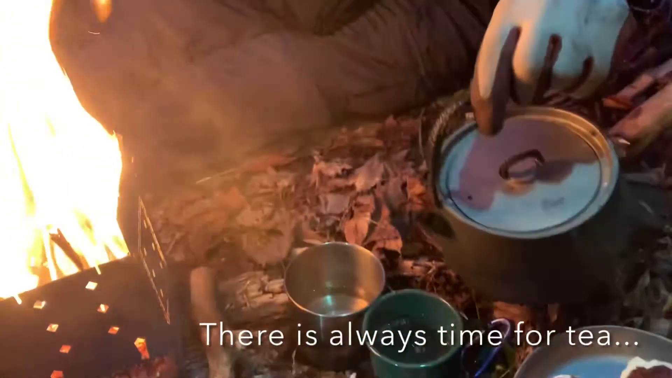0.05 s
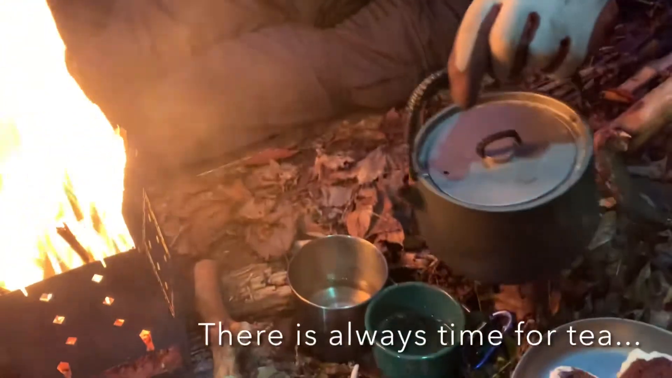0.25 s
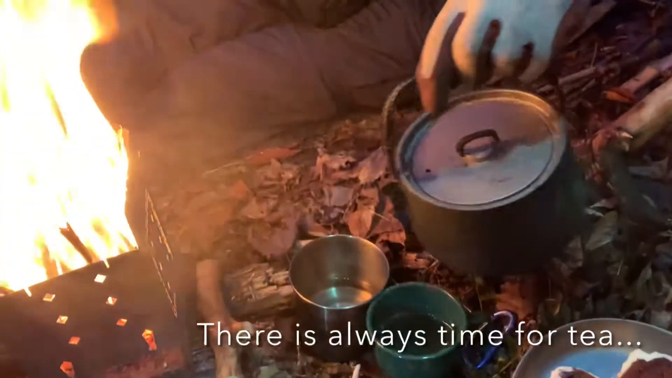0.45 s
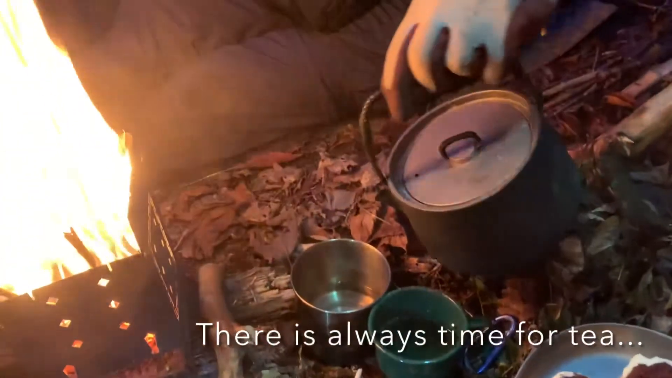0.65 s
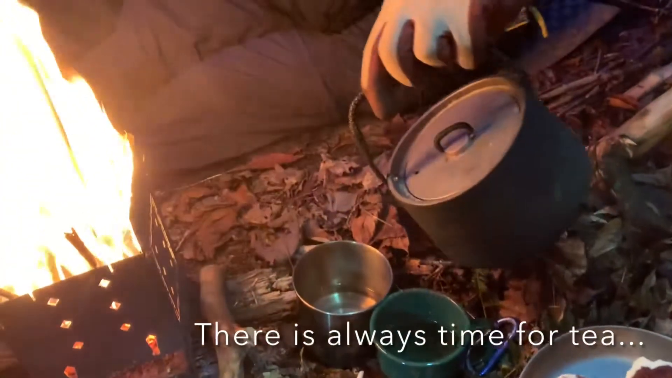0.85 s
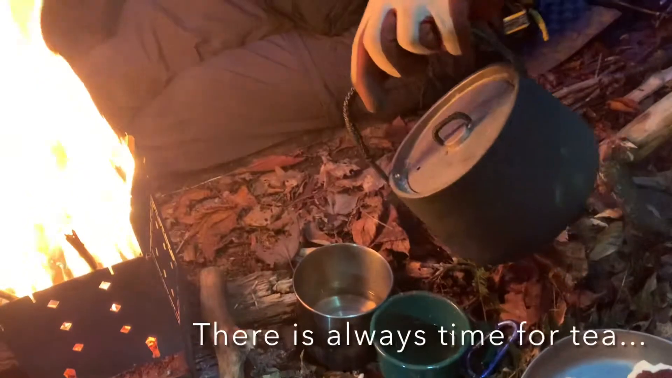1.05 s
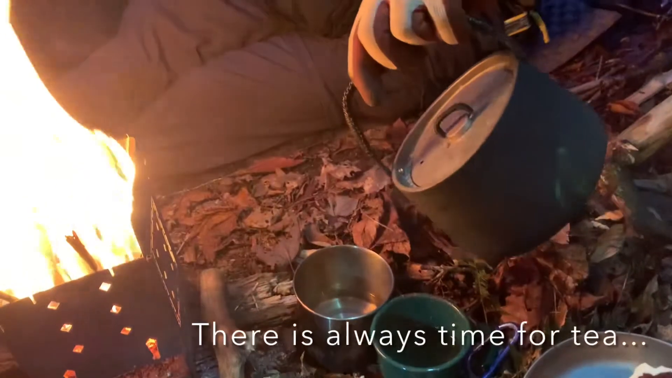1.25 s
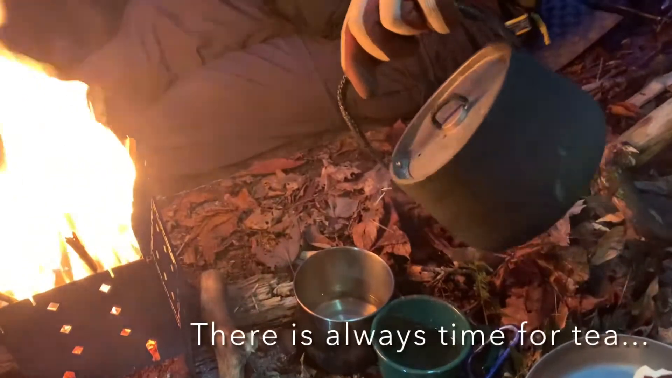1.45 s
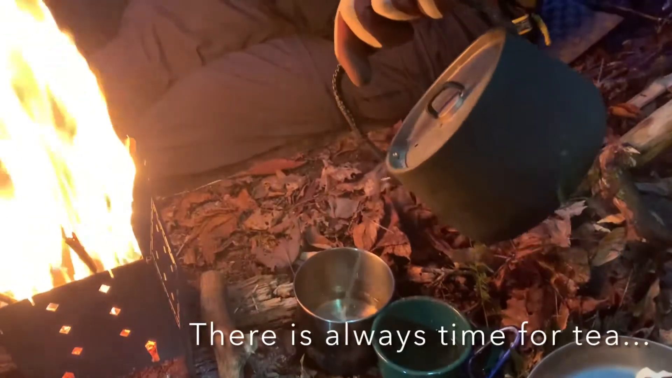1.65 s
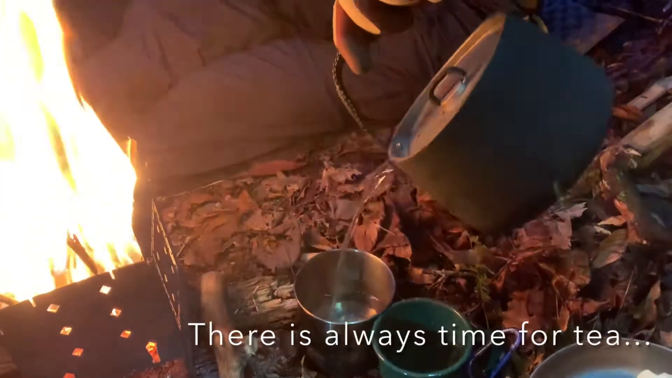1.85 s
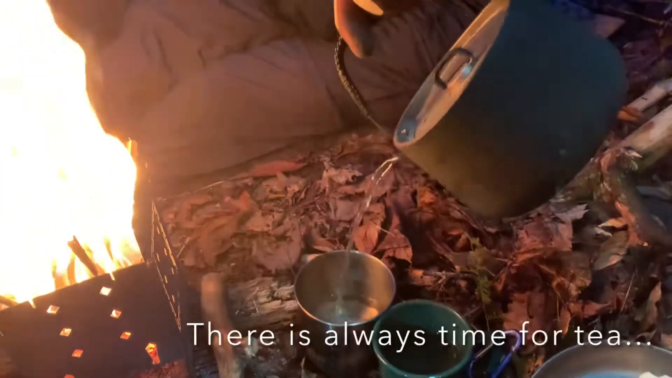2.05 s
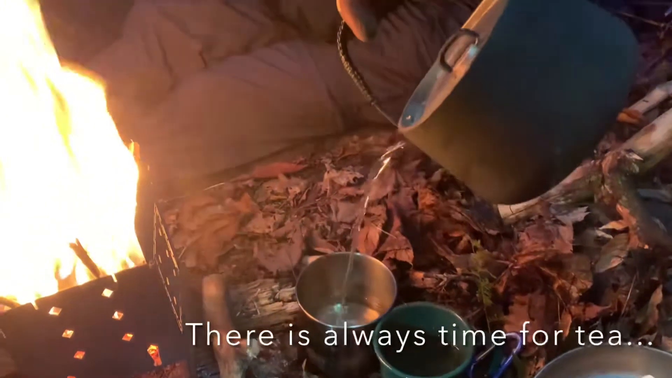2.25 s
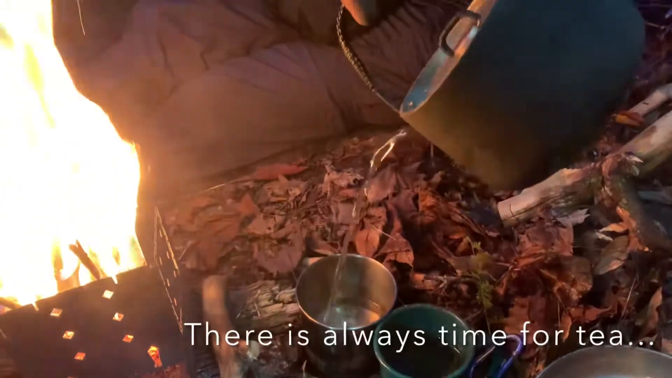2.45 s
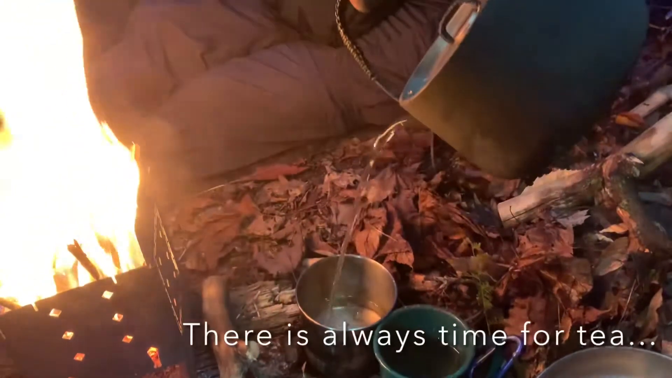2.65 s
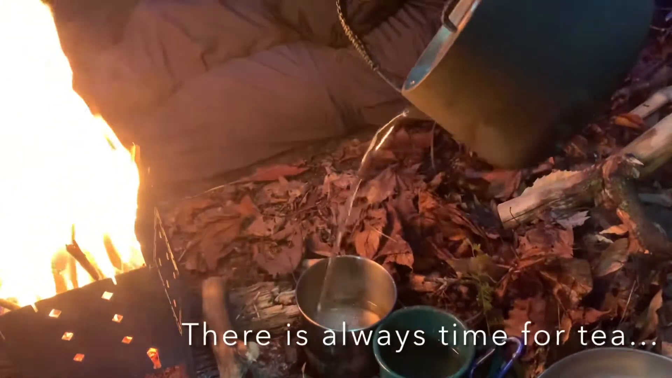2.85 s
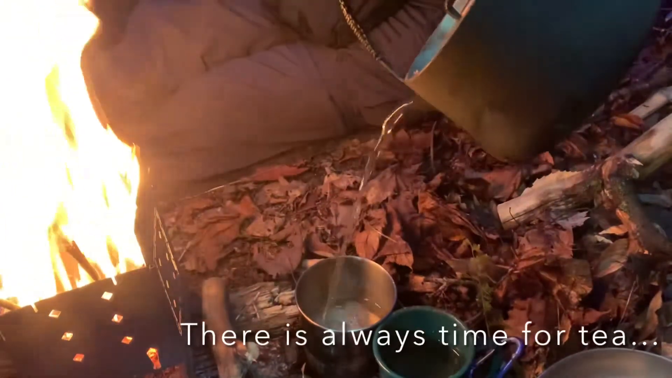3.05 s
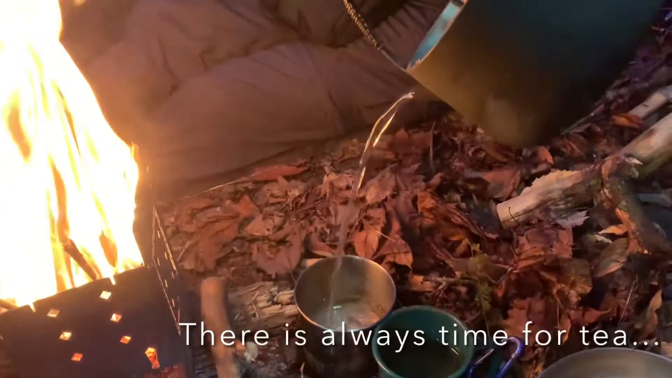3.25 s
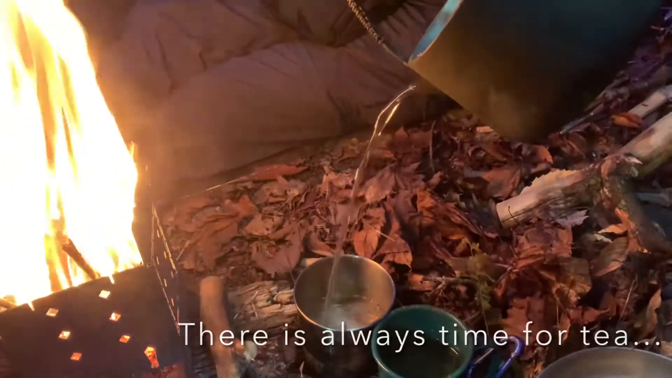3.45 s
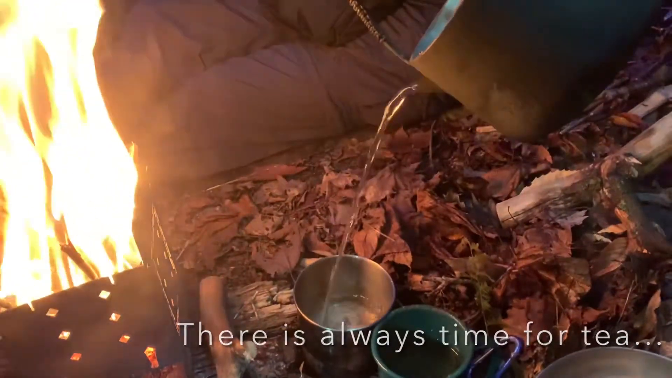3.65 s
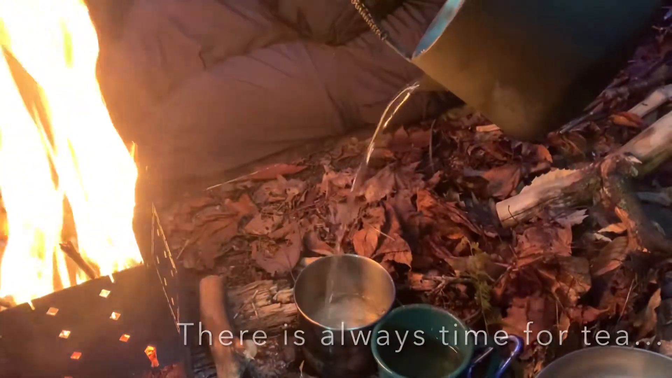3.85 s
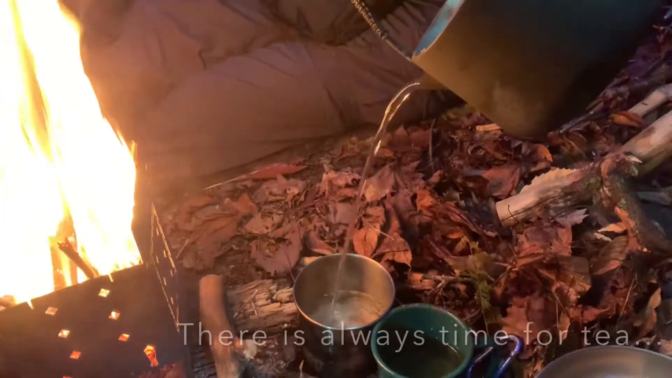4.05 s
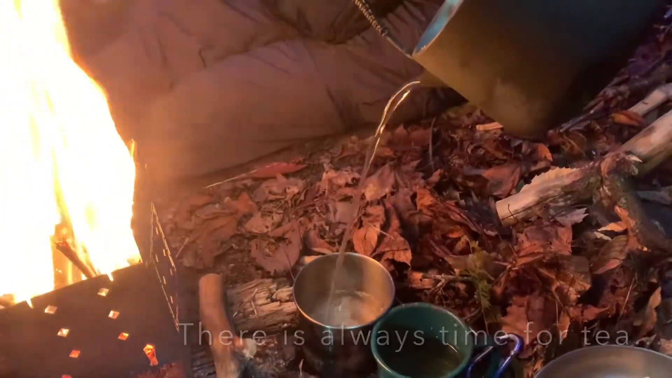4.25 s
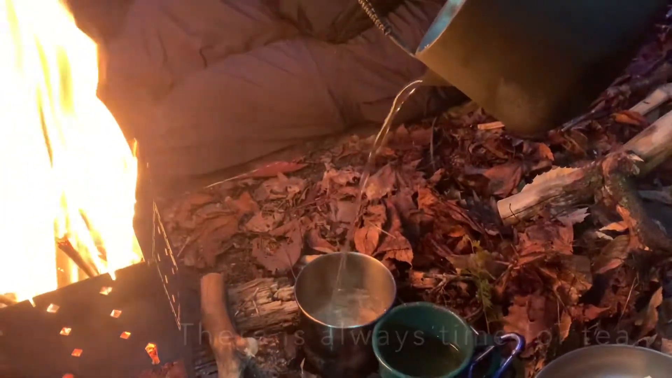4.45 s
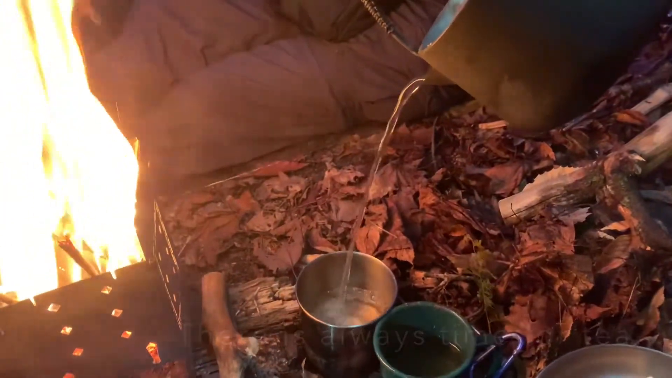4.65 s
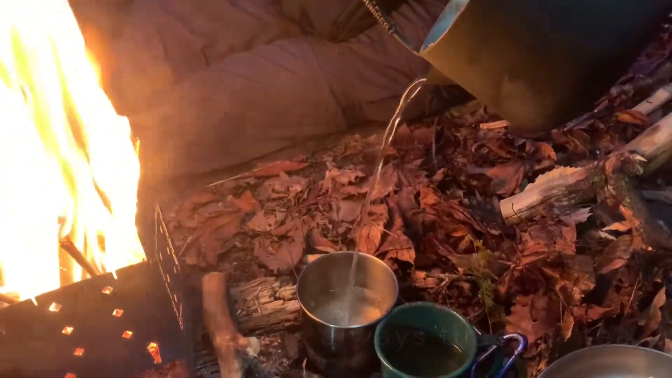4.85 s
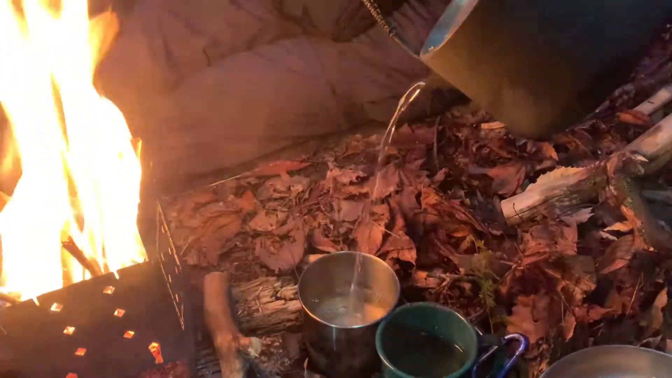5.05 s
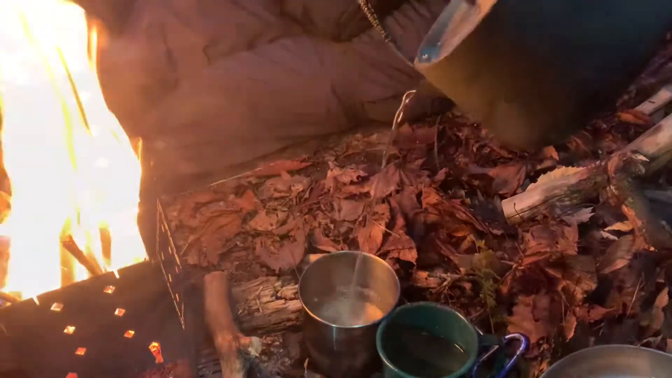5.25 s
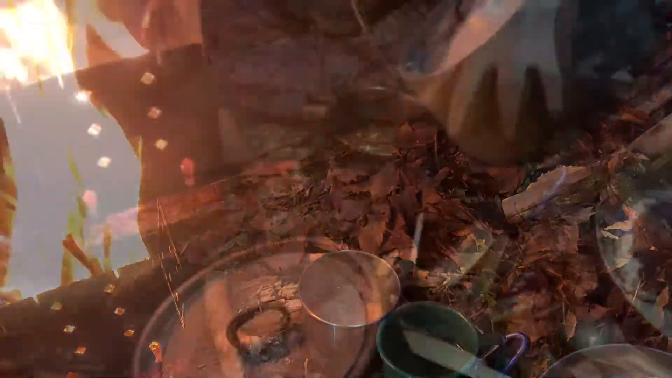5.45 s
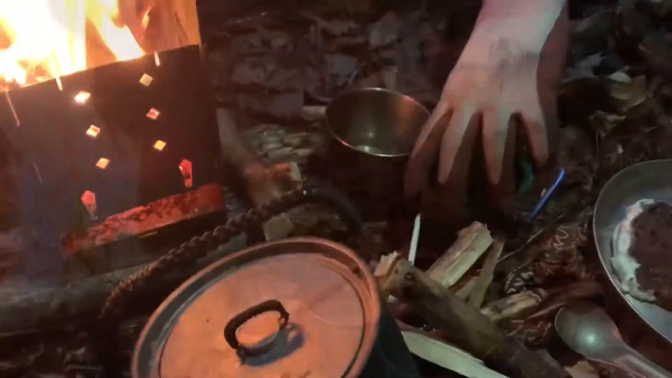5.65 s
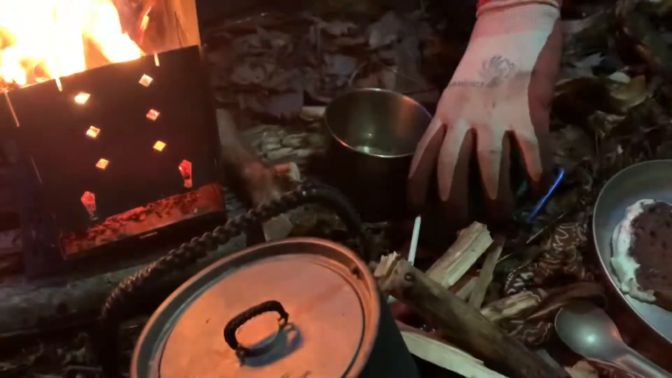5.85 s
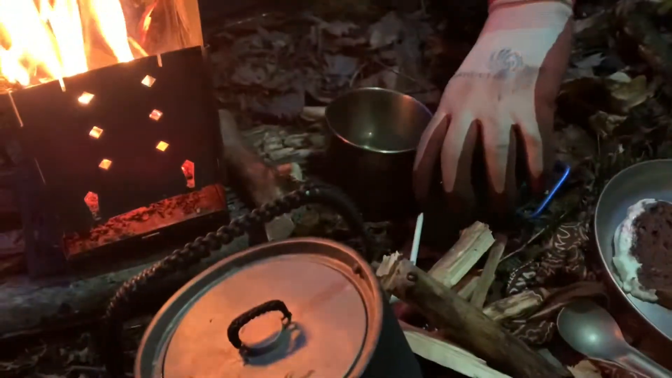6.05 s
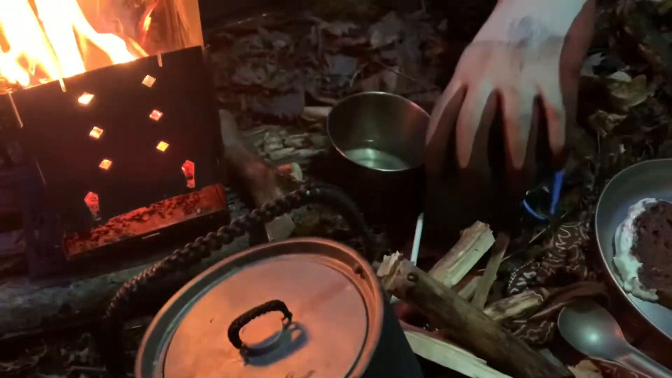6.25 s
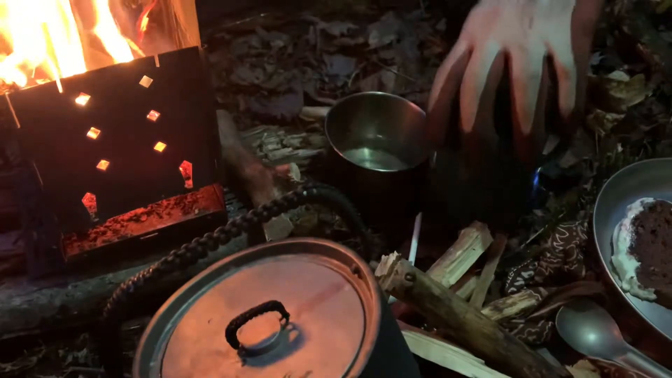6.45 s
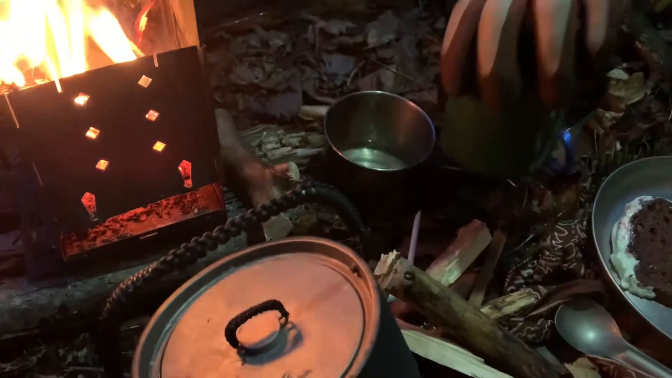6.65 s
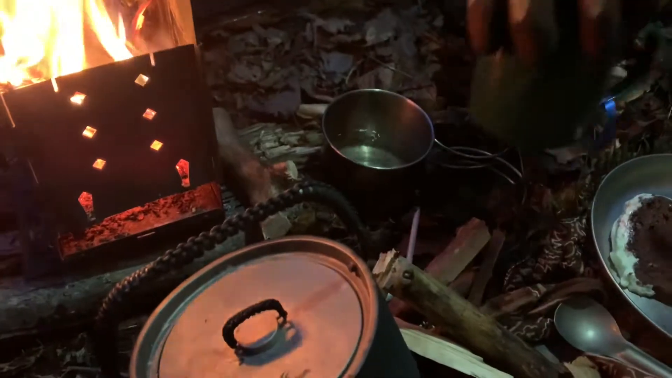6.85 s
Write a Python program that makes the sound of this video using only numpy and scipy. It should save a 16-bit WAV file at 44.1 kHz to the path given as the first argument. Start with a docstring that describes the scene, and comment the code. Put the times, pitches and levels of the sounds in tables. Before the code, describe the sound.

Tea pours from a pot into a metal mug beside a hissing, popping fire, followed by a brief clinking of mug and clip.

```python
"""Tea poured beside a wood stove

Flames rumble, sap hisses and the wood pops. Tea falls from a pot into a steel mug: the broken stream excites
the mug's normal modes and traps air bubbles, which ring as a gurgle. The fire sounds drop in level at about 5.5
s; then a hand picks up an enamel mug that rattles against a metal clip. Two spaced microphones hear it all
outdoors."""
import sys
import numpy as np
from scipy import signal
from scipy.fft import rfft, irfft, next_fast_len
from scipy.io import wavfile
from scipy.ndimage import uniform_filter1d, map_coordinates

SR = 44100
rng = np.random.default_rng(int(sys.argv[2]) if len(sys.argv) > 2 else 0)


def output_pcm(signal):
    """Save a mono or channel-first signal as 16-bit PCM at the path in sys.argv[1].

    Samples are clipped to [-1, 1] before scaling.
    """
    pcm = np.clip(np.atleast_2d(signal).T, -1, 1) * 32767
    wavfile.write(sys.argv[1], SR, np.round(pcm).astype(np.int16))


N = 304285
# Above the split, the left channel's treble lags slightly, which widens the sound.
SPLIT_HZ, TREBLE_LAG_S = 8300, 13 / SR


def amp(db):
    """Decibels to amplitude ratio."""
    return 10 ** (np.asarray(db) / 20)


def unit(x):
    """Normalisation to an rms of 1."""
    return x / np.sqrt(np.mean(x ** 2) + 1e-20)


def gain(spectrum, hz):
    """Amplitude response through (frequency_hz, level_db) points on a log frequency axis."""
    knots_hz, db = np.transpose(spectrum)
    return amp(np.interp(np.log(hz + 1), np.log(knots_hz + 1), db))


def contour(points):
    """Linear interpolation of (time_s, value) points at every sample."""
    return np.interp(np.arange(N) / SR, *np.transpose(points))


def wobble(rate_hz):
    """Smooth random modulation: a spline through Gaussian knots."""
    knots = rng.standard_normal(int(N * rate_hz / SR) + 4)
    return map_coordinates(knots, [np.arange(N) * rate_hz / SR])


def filtered(x, response):
    """Linear filtering: the spectrum times a frequency response."""
    size = next_fast_len(N + SR // 2)
    return irfft(rfft(x, size) * response(np.fft.rfftfreq(size, 1 / SR)), size)[..., :N]


def noise(spectrum, channels=1):
    """Coloured Gaussian noise of rms 1."""
    return unit(filtered(rng.standard_normal((channels, N)), lambda hz: gain(spectrum, hz)))


def burst(t, t60_s):
    """Exponential decay: white noise falling 60 dB in t60_s."""
    return amp(-60 * t / t60_s) * rng.standard_normal(len(t))


def add(track, start_s, sound):
    """Superposition of a short sound on a track."""
    part = track[round(start_s * SR):][:len(sound)]
    part += sound[:len(part)]


def resonances(modes, f):
    """Modal response: a sum of damped oscillators of alternating sign."""
    return sum((-1) ** k * amp(db) * 1j * f * width / (hz * hz - f * f + 1j * f * width)
               for k, (hz, width, db) in enumerate(modes))


def bubble(hz, cycles, rise):
    """Bubble resonance: a damped sine whose pitch climbs as the bubble nears the surface."""
    turns = np.arange(int(3 * cycles * SR / hz)) * hz / SR
    envelope = np.exp(-2 * turns / cycles) * (1 - np.exp(-turns / 0.5))
    return envelope * np.sin(2 * np.pi * turns * (1 + rise * turns / cycles))


def stereo(x, left_lead_s, scatter_db, left_db):
    """Time and level differences between the channels, plus separate scattering in each."""
    def delays(hz):
        whole = round(SPLIT_HZ * (left_lead_s + TREBLE_LAG_S))  # whole turns join the slopes smoothly
        above = np.clip((hz - SPLIT_HZ) / 1200 + .5, 0, 1)
        turns = (1 - above) * hz * left_lead_s + above * (whole - hz * TREBLE_LAG_S)
        return np.exp(-2j * np.pi * np.outer([0, 1], turns))
    t = np.arange(SR // 40) / SR
    tail = np.diff(rng.standard_normal((2, len(t) + 1))) * amp(-60 * t / 0.017) * (1 - np.exp(-t * 2000))
    scatter = signal.fftconvolve(x[None], tail / np.linalg.norm(tail[0]), axes=1)[:, :N]
    return (filtered(x, delays) + amp(scatter_db) * scatter) * amp([[left_db / 2], [-left_db / 2]])


# Loudness of the flames: time_s, level_db
FLAME_LEVEL = [(0, -55), (.2, -52.5), (.9, -58), (1.2, -50), (1.35, -58), (1.58, -52), (1.75, -49.5),
               (2.04, -54), (2.3, -51), (2.6, -53.5), (3.3, -51), (3.45, -46), (3.8, -51.5), (4.2, -48.5),
               (4.9, -52.5), (5.2, -56), (5.32, -59), (5.55, -59), (6.15, -63.5), (6.9, -61.5)]
# Flame spectrum: frequency_hz, level_db
FLAME_SPECTRUM = [(13, -47), (28, -29), (49, 1), (97, -2.5), (183, -14.5), (262, -21.5), (295, -28.5),
                  (474, -36), (747, -46.5), (1520, -73), (2500, -58), (3250, -96), (5500, -120)]

def flames():
    """Combustion noise: an uneven rumble, nearly alike on both sides at long wavelengths."""
    mid, side = noise(FLAME_SPECTRUM, channels=2) * amp(2.17 * wobble(14) + 3.44 * wobble(7))
    side = filtered(side, lambda hz: amp(-21) * np.sqrt(1 + (hz / 200) ** 2))
    rumble = unit(mid + np.array([side, -side])) * amp([[.4], [-.4]])
    return amp(contour(FLAME_LEVEL)) * rumble


# Loudness of the sap: time_s, level_db
SAP_LEVEL = [(0, -55), (.25, -52.5), (.5, -56.5), (1.5, -55), (2.8, -50.5), (3.6, -54), (4.6, -51.5),
             (5.2, -53.5), (5.4, -60.5), (5.55, -74.5), (6.9, -69.5)]
# Sap spectrum: frequency_hz, level_db
SAP_SPECTRUM = [(900, -39), (2000, -58), (3000, -18.5), (4000, -11), (5000, 0), (6500, 3), (8000, 7.5),
                (11000, 5), (14000, 9.5), (15600, 1.5), (16000, -21), (17500, -46.5)]

def sap_hiss():
    """Amplitude-modulated noise: sap hisses with a flicker and sparse tiny crackles."""
    crackles = amp(4.8 * rng.standard_exponential(N) * (rng.random(N) < .01))
    hiss = noise(SAP_SPECTRUM, channels=3) * amp(0.38 * wobble(4.8) + 1.6 * wobble(45))
    hiss = amp(contour(SAP_LEVEL)) * unit(hiss * uniform_filter1d(crackles, size=12))
    return stereo(hiss[0], TREBLE_LAG_S, scatter_db=-26.5, left_db=-0.9) + amp(-11) * hiss[1:]


# Background of quiet woods: frequency_hz, level_db
AIR_SPECTRUM = [(200, 8.5), (500, 4), (1500, -5.5), (4000, -2), (14000, -18), (16000, -20.5), (17500, -22)]

def outdoor_air():
    """Ambient noise, uncorrelated between the microphones."""
    return amp(-75.5) * noise(AIR_SPECTRUM, channels=2)


# Low thumps: start_s, level_db, start_hz, end_hz, attack_s
LOW_THUMPS = [(0.045, -56.5, 600, 300, 0.00087), (1.557, -35.5, 200, 61, 0.00023),
              (3.446, -36, 156, 61, .0003), (5.229, -22.5, 427, 42.7, 0.00032),
              (5.645, -44.5, 252.5, 74.6, 0.0023), (6.186, -51, 350, 331, 0.0056),
              (6.265, -44.5, 164, 71.6, 0.00087), (6.774, -43, 149, 70.6, 0.0027)]

def thumps():
    """Damped chirps: short, dull tones that fall in pitch."""
    track, t = np.zeros(N), np.arange(SR // 15) / SR
    fade = np.cos(np.pi * t / (2 * t[-1]))
    for start_s, db, start_hz, end_hz, attack_s in LOW_THUMPS:
        turns = np.cumsum(end_hz + (start_hz - end_hz) * np.exp(-t / 0.006)) / SR
        envelope = amp(db - 60 * t / 0.13) * (1 - np.exp(-(t / attack_s) ** 2)) * fade
        add(track, start_s, envelope * np.sin(2 * np.pi * turns))
    return track


# Pops of burning wood: start_s, level_db, tail_db
WOOD_POPS = [(0.106, -46.5, -8), (0.3267, -38, -8.5), (0.599, -30.5, -5.5), (1.542, -6.5, -5),
             (1.83, -30, -11), (2.132, -33.5, -9), (3.31, -28, -6.5), (3.4369, -6.5, -10),
             (4.0345, -8, -14), (4.039, -7, -7.5), (5.2255, -12, -1), (5.3861, -38, -2), (5.652, -54, -6)]
# Pop spectrum: frequency_hz, level_db
POP_SPECTRUM = [(300, -9), (1200, -8), (2000, -10), (3500, -5), (6500, 3.5), (10000, 0.5), (14000, 0.5),
                (16500, -15)]

def wood_pops(rise_s=.00013):
    """Broadband impulses: a millisecond crack, then a short hissing tail."""
    track, t = np.zeros(N), np.arange(SR // 15) / SR
    for start_s, db, tail_db in WOOD_POPS:
        snap = np.sign(rng.standard_normal(len(t))) * t / rise_s * np.exp(-t / rise_s)
        add(track, start_s, amp(db + 10) * (snap + amp(tail_db - 16.5) * burst(t, 0.041)))
    cracks = filtered(track, lambda hz: gain(POP_SPECTRUM, hz))
    return stereo(cracks, TREBLE_LAG_S, scatter_db=-17, left_db=-0.5)


# Loudness of the stream: time_s, level_db
FLOW_LEVEL = [(1.555, -120), (1.565, -52), (1.79, -65.5), (1.835, -49.5), (2.07, -53), (2.12, -47),
              (3.45, -43), (4.15, -43), (4.5, -41.5), (4.9, -39.5), (5.05, -43), (5.23, -40), (5.25, -55.5),
              (5.48, -55.5), (5.56, -120)]
# Spray spectrum: frequency_hz, level_db
SPRAY_SPECTRUM = [(1200, -9.5), (2500, -15.5), (3300, -3.5), (4500, 7.5), (6500, 0.5), (10000, -2),
                  (14500, -10), (16000, -42.5)]

def pouring():
    """Liquid impact: resonances of mug and bubbles gurgle under broadband spray."""
    flow_db = contour(FLOW_LEVEL)
    flow = amp(flow_db)
    glugs, slug_spray = slugs(flow_db)
    pings, splash_spray = splashes()
    gurgle = stream(flow) + glugs + droplets(flow) + drips() + froth(flow) + pings
    mist = amp(-10.5 + 4.5 * wobble(80)) * flow * rng.standard_normal(N)
    spray = filtered(mist + slug_spray + splash_spray + spatter(flow),
                     lambda hz: gain(SPRAY_SPECTRUM, hz))
    # The mug is nearer the left microphone.
    return stereo(gurgle + spray, left_lead_s=4 / SR, scatter_db=-5, left_db=.6)


# Modes of the steel mug: pitch_hz, width_hz, level_db
STEEL_MODES = [(485.7, 33.6, 8), (730, 70, 0.5), (860, 190, -3), (1107, 81, 6), (1333, 53, 2.5),
               (1910, 330, -12), (2436, 59, -2), (3780, 260, -10)]

def stream(flow):
    """Forced vibration: the broken stream drives the mug's modes with separate taps."""
    patter = rng.standard_normal(N) * (0.3 + 8 * (rng.random(N) < .005))
    force = amp(5.5 + 5.5 * wobble(35)) * flow * patter
    return filtered(force, lambda hz: resonances(STEEL_MODES, hz))


# Prominent slugs of tea: start_s, level_db, pitch_hz
TEA_SLUGS = [(1.558, -34.5, 793), (1.64, -58, 920), (1.668, -39, 1194), (1.694, -34, 980),
             (1.828, -35.5, 930), (1.893, -35, 976), (1.971, -40.5, 883), (2.053, -43.5, 887),
             (2.094, -31.5, 886), (2.11, -30, 1016), (2.163, -31.5, 478), (2.194, -32.5, 490),
             (2.269, -33, 794), (2.297, -34, 780), (2.339, -38.5, 800), (2.362, -33.5, 1070),
             (2.406, -40, 504), (2.501, -33.5, 470), (2.51, -29, 1086), (2.578, -30, 484),
             (2.598, -37, 676), (2.626, -40, 1003), (2.666, -41, 527), (2.709, -32.5, 1007),
             (2.721, -41.5, 1130), (2.774, -38, 486), (2.813, -35, 1100), (2.902, -33.5, 654),
             (2.924, -37, 468), (2.976, -38.5, 990), (3.033, -30, 1060), (3.078, -27.5, 477),
             (3.117, -29, 490), (3.235, -32, 463), (3.263, -35.5, 1094), (3.282, -30, 456),
             (3.303, -39, 1034), (3.339, -33, 517), (3.358, -34.5, 440), (3.377, -34, 432),
             (3.404, -34, 1070), (3.598, -30, 1054), (3.643, -34, 1300), (3.674, -27.5, 1340),
             (3.718, -38, 1030), (3.741, -30.5, 453), (3.794, -39, 1204), (3.82, -40, 1110),
             (3.864, -32, 465), (3.876, -30, 410), (3.928, -32.5, 1090), (3.99, -34, 442),
             (4.115, -43.5, 466), (4.166, -27.5, 1093), (4.184, -27, 501), (4.224, -31.5, 914),
             (4.3, -25, 1082), (4.319, -29, 1040), (4.407, -46.5, 1070), (4.449, -45, 1000),
             (4.485, -25.5, 1028), (4.589, -26.5, 933), (4.617, -41, 1050), (4.639, -32, 1045),
             (4.666, -36.5, 510), (4.684, -31.5, 454), (4.728, -37.5, 487), (4.787, -32, 485),
             (4.805, -31, 980), (4.836, -30, 1090), (4.859, -28.5, 1064), (4.886, -27, 720),
             (4.918, -31, 730), (5.006, -42, 1110), (5.078, -28, 1064), (5.095, -23, 1220),
             (5.136, -31, 1094), (5.168, -29.5, 453), (5.206, -30.5, 983), (5.273, -45, 967),
             (5.419, -41.5, 905)]

def slugs(flow_db, loss_db_per_octave=4):
    """Impact excitation: a slug sprays, traps a bubble and rings the mug modes near its pitch."""
    glugs, spray = np.zeros((2, N))
    t = np.arange(SR // 20) / SR
    f = np.fft.rfftfreq(2 * len(t), 1 / SR)
    lesser = []
    for start_s in rng.uniform(2.2, 5.2, size=40):
        size, pick, detune = rng.standard_normal(3)
        hz = (1052 if pick > 0 else 445) * (1 + 0.094 * detune)  # around two tones of the mug
        lesser.append((start_s, flow_db[round(start_s * SR)] - 0.5 + 4.4 * size, hz))
    for start_s, db, hz in TEA_SLUGS + lesser:
        modes = [(pitch, width, level - loss_db_per_octave * abs(np.log2(pitch / hz)) + rng.normal(0, 2))
                 for pitch, width, level in STEEL_MODES]
        slap = burst(t, 0.018) * (1 - np.exp(-t / 0.0005))
        ring = irfft(rfft(slap, 2 * len(t)) * resonances(modes, f))
        add(glugs, start_s, amp(db - 3) * ring / np.abs(ring).max())
        add(spray, start_s, amp(db - 10.5 + rng.normal(0, 3)) * burst(t, 0.0088))
        tone = bubble(hz, cycles=hz * rng.uniform(.009, 0.023), rise=rng.uniform(0, .12))
        add(glugs, start_s, amp(db - 3.5) * tone)
    return glugs, spray


def droplets(flow):
    """Air entrainment: droplets trap bubbles, the small ones higher and fainter."""
    track = np.zeros(N)
    for when, pitch, faintness in rng.random((650, 3)):
        start_s = 1.56 + 3.9 * when
        strength = flow[round(start_s * SR)] * amp(-10 - 4 * np.log(faintness + 0.0055) - 9 * pitch)
        add(track, start_s, strength * bubble(650 * 11 ** pitch, cycles=20.2, rise=0.012))
    return track


# Distinct drops: start_s, level_db, pitch_hz, rise_ratio, decay_cycles
CLEAR_DROPS = [(1.598, -45, 750, .042, 5), (1.718, -37, 950, 0.45, 5.6), (1.727, -42.5, 1950, 0.26, 12),
               (1.752, -44.5, 2300, 0.1, 12), (1.943, -39.5, 2350, 0.04, 14),
               (1.792, -50.5, 1270, .05, 8.8), (1.802, -47.5, 2500, 0.037, 15), (1.9, -46, 800, 0.12, 11),
               (3.105, -33, 2400, 0.022, 16), (4.099, -54, 1197, .03, 9.7), (5.449, -48, 887, 0.082, 9.5),
               (5.481, -44.5, 2470, 0.024, 20.4), (5.505, -50.5, 2430, 0.022, 12)]

def drips():
    """Free oscillation of single bubbles: each drop gives a clear rising note."""
    track = np.zeros(N)
    for start_s, db, hz, rise, cycles in CLEAR_DROPS:
        add(track, start_s, amp(db) * bubble(hz, cycles, rise))
    return track


def froth(flow):
    """Resonant frequency varies inversely with radius: tiny bubbles ping in the treble."""
    track = np.zeros(N)
    for when, pitch, faintness in rng.random((450, 3)):
        start_s = 1.8 + 3.5 * when
        strength = flow[round(start_s * SR)] * amp(-16 - 3 * np.log(faintness + .03))
        add(track, start_s, strength * bubble(2600 * 2.6 ** pitch, cycles=12, rise=0.02))
    return track


# Splashes in the mug: start_s, level_db, pitch_hz
TEA_SPLASHES = [(1.944, -31.5, 3720), (1.975, -39, 4370), (2.531, -37, 4300), (2.599, -40, 7300),
                (2.664, -36.5, 4200), (2.105, -29, 6200), (2.1952, -27, 6700), (2.294, -34.5, 6000),
                (2.371, -35.5, 9600), (2.746, -35, 13000), (2.818, -34, 9960), (2.856, -33, 9500),
                (3.04, -33, 2250), (3.196, -39, 10460), (3.234, -31.5, 2400), (3.5968, -29, 5600),
                (3.7406, -26.5, 7500), (3.8772, -34, 10400), (3.982, -31.5, 10700), (4.056, -30, 5950),
                (4.1673, -37, 9420), (4.32, -28, 4800), (4.4052, -29.5, 9360), (4.446, -36, 13500),
                (4.477, -35, 10550), (4.638, -29, 6030), (4.762, -31.5, 7560), (4.799, -31.5, 7900),
                (4.919, -21.5, 2470), (5.0502, -30, 2470)]

def splashes():
    """Impact noise and bubble resonance: each splash is a high ping with a burst of spray."""
    pings, spray = np.zeros((2, N))
    t = np.arange(SR // 20) / SR
    for start_s, db, hz in TEA_SPLASHES:
        add(spray, start_s, amp(db - 3.5) * burst(t, 0.039) * (1 - np.exp(-t / 0.00014)))
        add(pings, start_s, amp(db - 2.5) * bubble(hz, cycles=5 + hz * 0.0053, rise=0.0055))
    return pings, spray


def spatter(flow):
    """Shot noise: fine drops tick on the steel wall at random times."""
    track, t = np.zeros(N), np.arange(SR // 20) / SR
    for when, faintness in rng.random((100, 2)):
        start_s = 2.2 + 3.1 * when
        strength = flow[round(start_s * SR)] * amp(-14.5 - 4 * np.log(faintness + 0.05))
        add(track, start_s, strength * burst(t, rng.uniform(.008, 0.03)))
    return track


def gripped(modes, f, damping):
    """Damping by the fingers widens the modes; pitch and strength vary at each contact."""
    return resonances([(hz * rng.normal(1, .008), width * damping, db + rng.normal(0, 3))
                       for hz, width, db in modes], f)


# Contacts of mug and clip: start_s, level_db, mug_db, length_s, clip_tilt_db_per_octave
CONTACTS = [(5.93, -50, -20.5, 0.12, 6), (5.946, -47.5, -19, 0.22, 1), (5.983, -46.5, -9, 0.35, -3.5),
            (6.0065, -24, -16, 0.13, -1.5), (6.015, -19, -23, 0.046, -2), (6.021, -28, -21, 0.056, -7),
            (6.0316, -12.5, -16.5, 0.082, -0.5), (6.075, -19.5, -6, 0.11, 7),
            (6.117, -24.5, -11.5, 0.18, 0.5), (6.133, -34.5, -18, 0.28, 3.5),
            (6.2628, -33, -2.5, 0.06, 3.5), (6.293, -31.5, -18, 0.16, 1.5), (6.339, -29, -20.5, 0.26, -5.5),
            (6.402, -49, -7, 0.2, -6), (6.465, -39.5, -26, 0.23, -7), (6.501, -42, -29, 0.067, -12),
            (6.56, -44.5, -11.5, 0.3, -4.5)]
# Modes of the enamel mug before the grip damps them: pitch_hz, width_hz, level_db
ENAMEL_MODES = [(428, 16, -20), (819, 29, 1), (1170, 90, -10.5), (1464, 18, 0.5), (1840, 71, -4),
                (2614, 21, -2)]
CLIP_MODES = [(2980, 35, -15.5), (4296, 29, 1), (5025, 29, 2), (6090, 40, 1.5), (7950, 34, -10.5),
              (8136, 50, 9.5), (8270, 62, 4), (9410, 57, 3), (10770, 160, -5.5), (13120, 110, 0)]
# Broadband jangle of metal: frequency_hz, level_db
JANGLE_SPECTRUM = [(500, -15.5), (800, -6), (2000, -9), (4000, 1), (6000, 4), (9000, 8.5), (14000, 13.5),
                   (15500, -10.5), (16500, -32.5)]

def rattle(damping=2.2, treble_hz=7500, treble_t60_s=.16):
    track, t = np.zeros(N), np.arange(SR // 3) / SR
    f = np.fft.rfftfreq(len(t), 1 / SR)
    lowpass = 1 / (1 + (f / treble_hz) ** 4)
    for start_s, db, mug_db, length_s, tilt_db in CONTACTS:
        scrape = amp(-40 * t / length_s - 60 * (t / length_s) ** 2)
        tick = 0.82 * amp(-60 * t / 0.0067)
        force = (scrape + tick) * (1 - np.exp(-t / 0.00049)) * rng.standard_normal(len(t))
        brief = force * amp(-60 * t / treble_t60_s)  # the treble dies sooner
        drive = rfft(force) * lowpass + rfft(brief) * (1 - lowpass)
        clip = amp(-14.5) * gain(JANGLE_SPECTRUM, f) + amp(4) * gripped(CLIP_MODES, f, damping)
        clip *= amp(tilt_db * np.log2(1 + f / 5000))
        mug = amp(mug_db + 13.5) * gripped(ENAMEL_MODES, f, np.sqrt(damping))
        clink = irfft(drive * (clip + mug), len(t))
        add(track, start_s, amp(db) * clink / np.abs(clink).max())
    return stereo(track, left_lead_s=.00001, scatter_db=-8, left_db=0.5)


def scene():
    """Superposition of all sources in two channels."""
    return flames() + sap_hiss() + outdoor_air() + thumps() + wood_pops() + pouring() + rattle()


def record(dry):
    """Band limiting by an ideal low-pass filter."""
    return filtered(dry, lambda hz: hz < 17200)


dry = scene()
out = record(dry)
output_pcm(out)
```